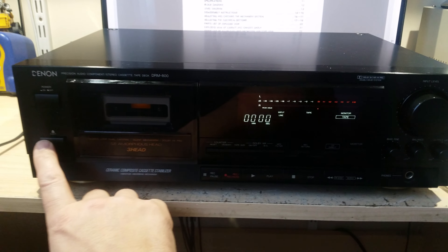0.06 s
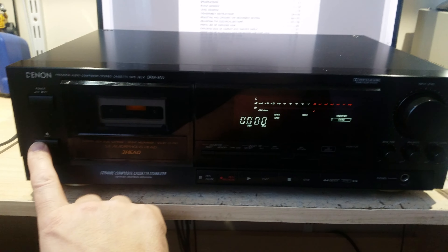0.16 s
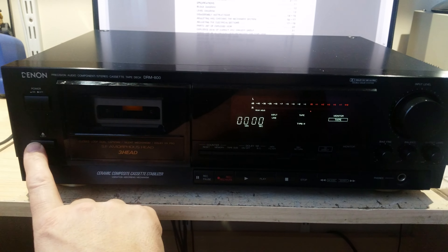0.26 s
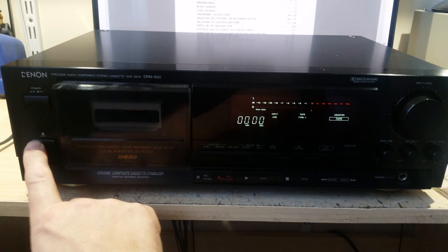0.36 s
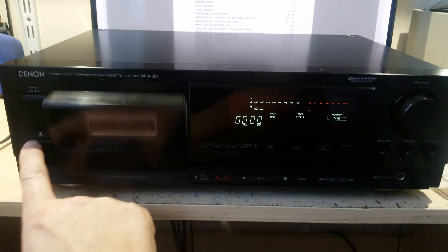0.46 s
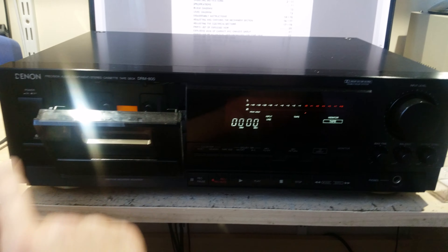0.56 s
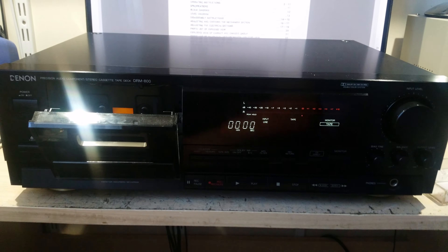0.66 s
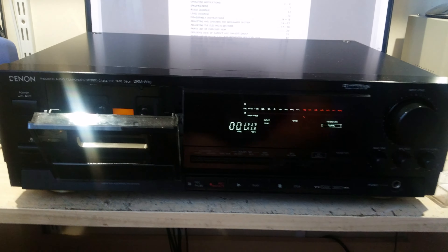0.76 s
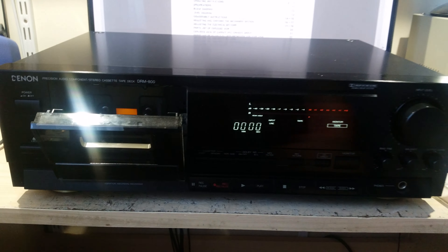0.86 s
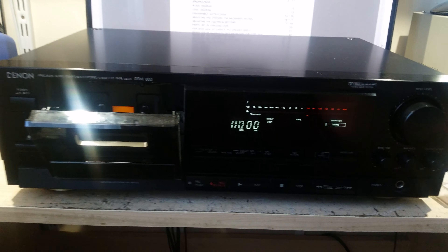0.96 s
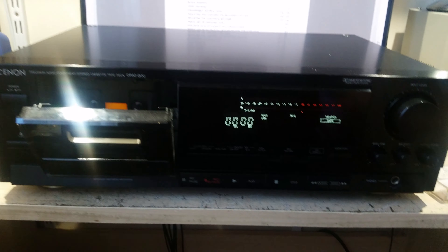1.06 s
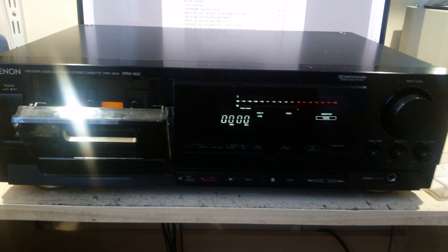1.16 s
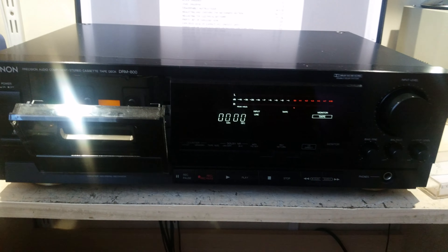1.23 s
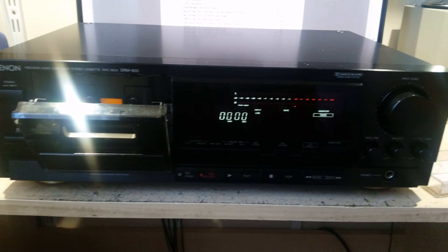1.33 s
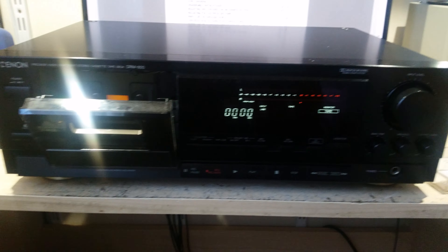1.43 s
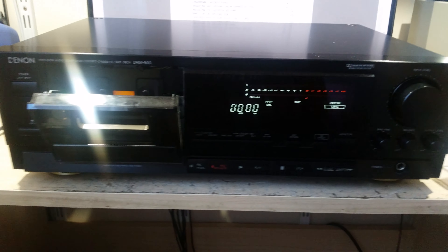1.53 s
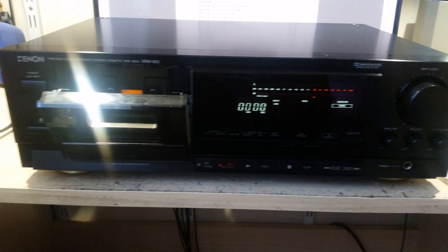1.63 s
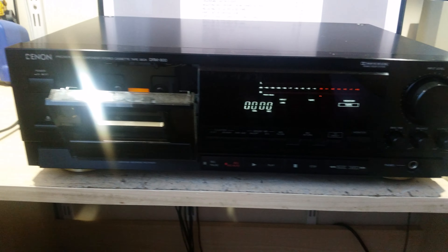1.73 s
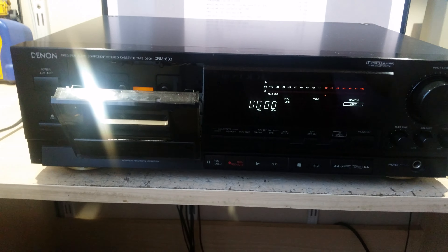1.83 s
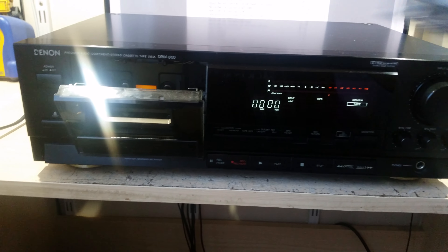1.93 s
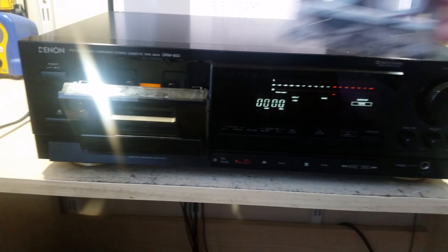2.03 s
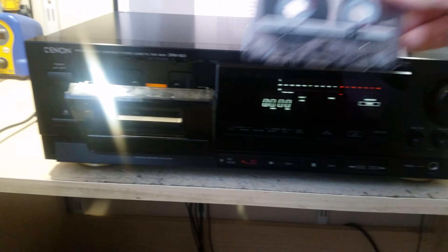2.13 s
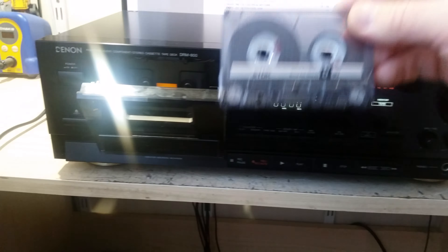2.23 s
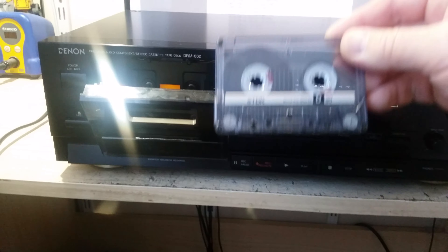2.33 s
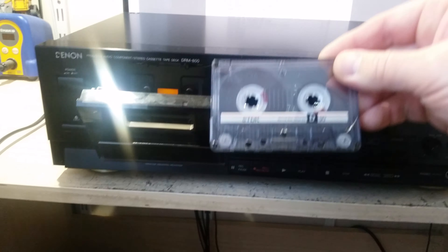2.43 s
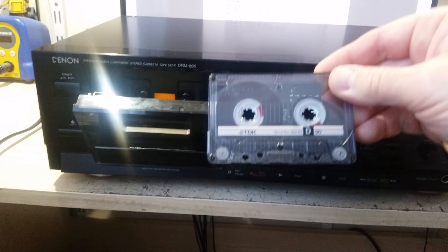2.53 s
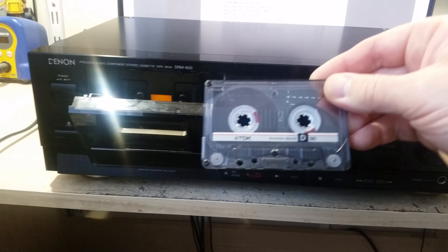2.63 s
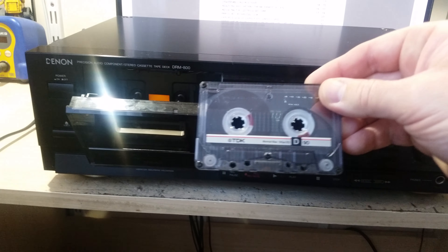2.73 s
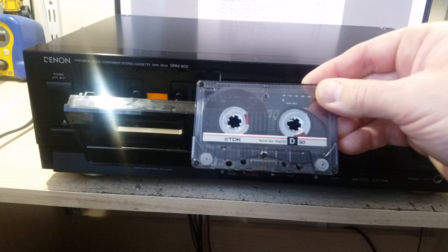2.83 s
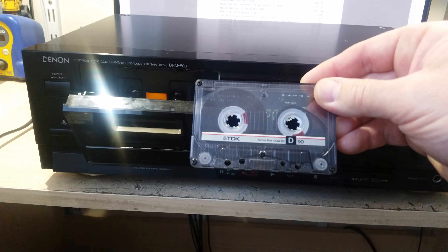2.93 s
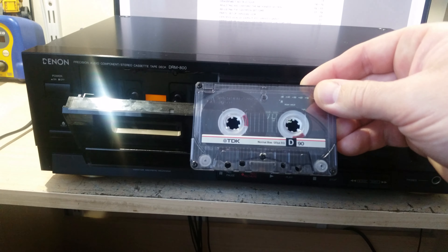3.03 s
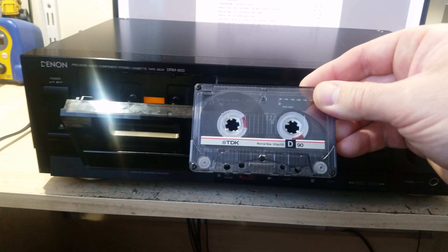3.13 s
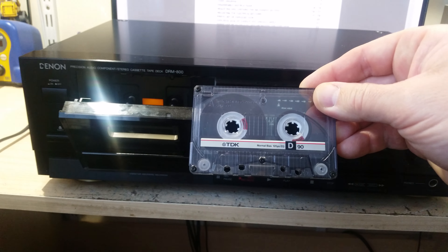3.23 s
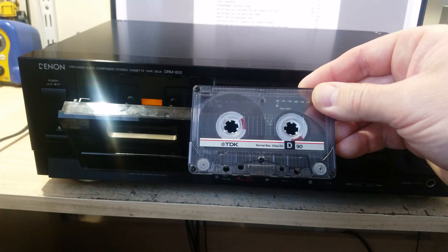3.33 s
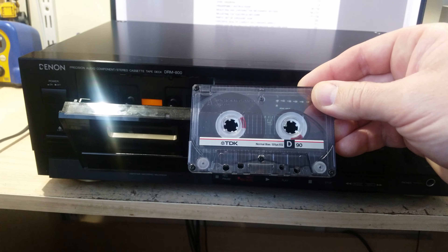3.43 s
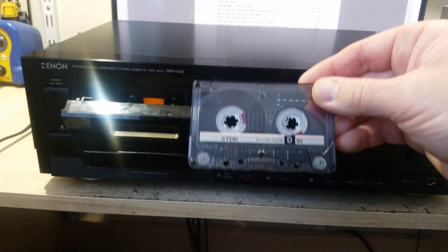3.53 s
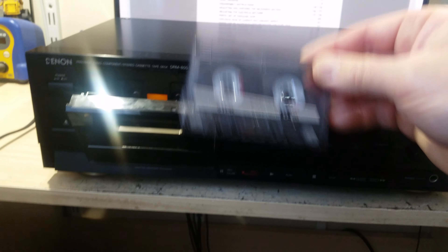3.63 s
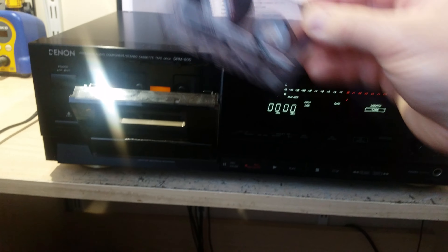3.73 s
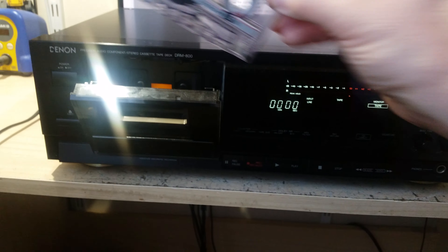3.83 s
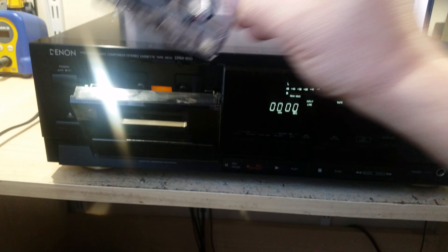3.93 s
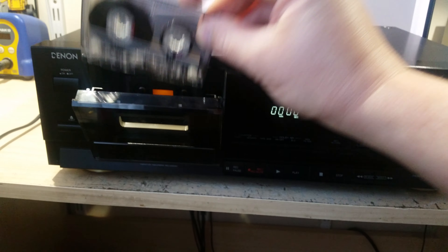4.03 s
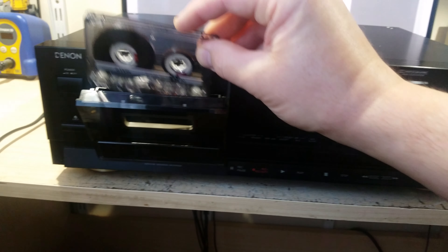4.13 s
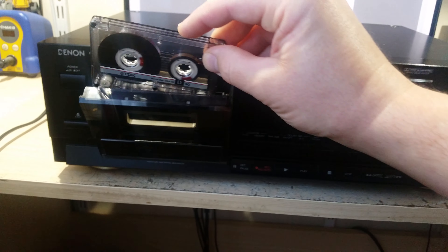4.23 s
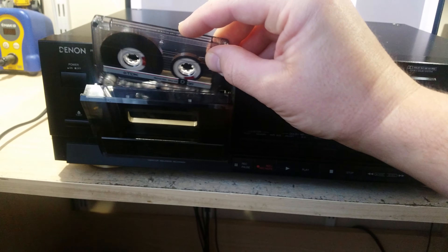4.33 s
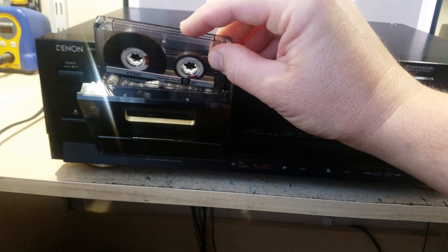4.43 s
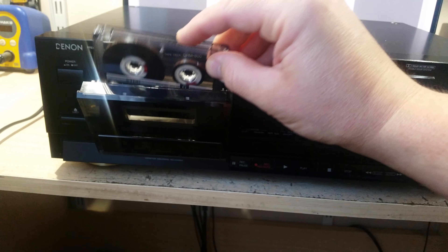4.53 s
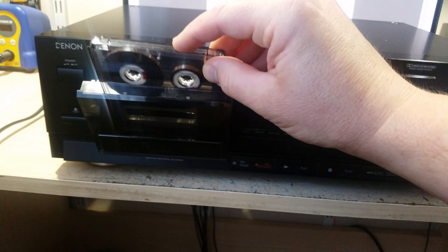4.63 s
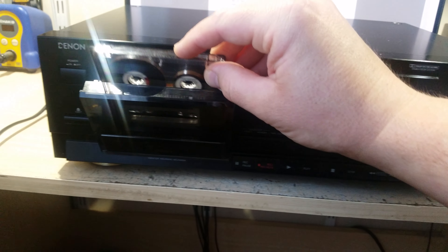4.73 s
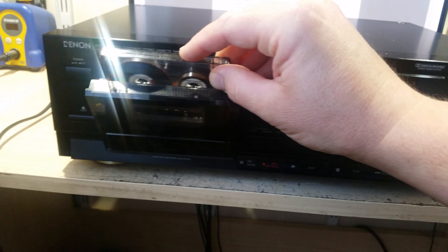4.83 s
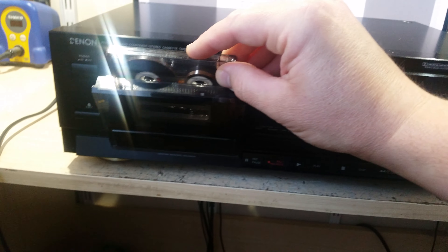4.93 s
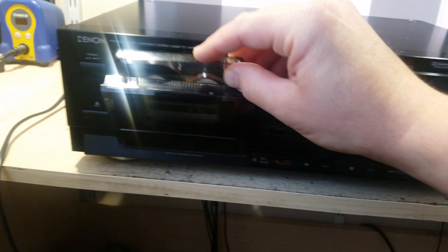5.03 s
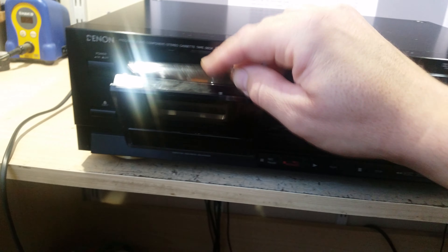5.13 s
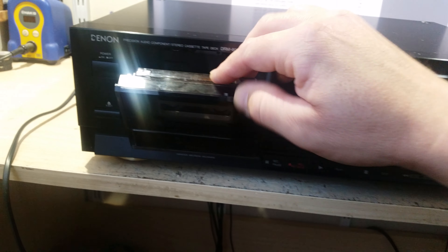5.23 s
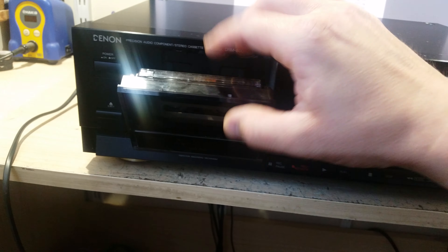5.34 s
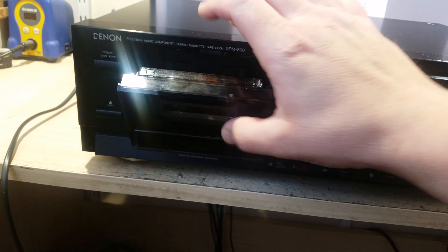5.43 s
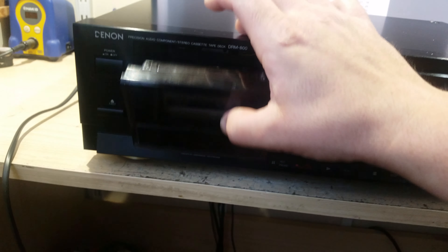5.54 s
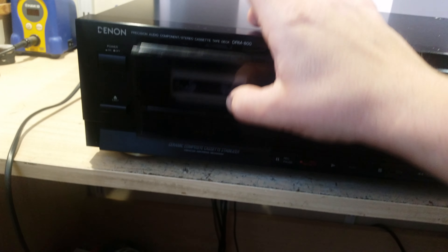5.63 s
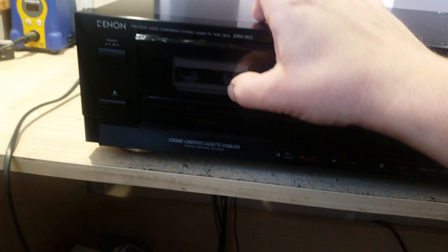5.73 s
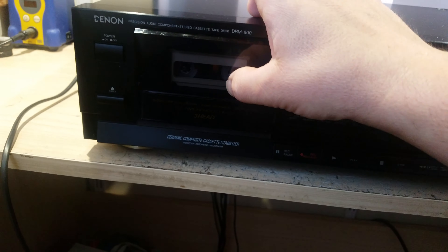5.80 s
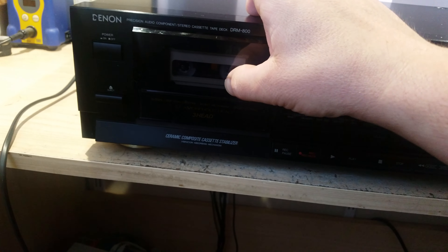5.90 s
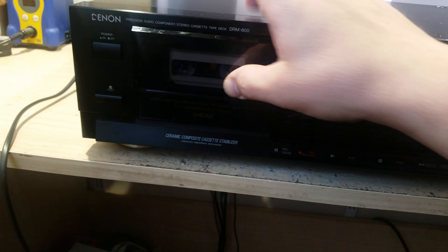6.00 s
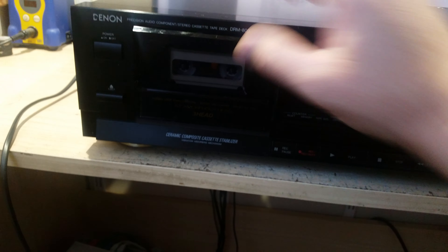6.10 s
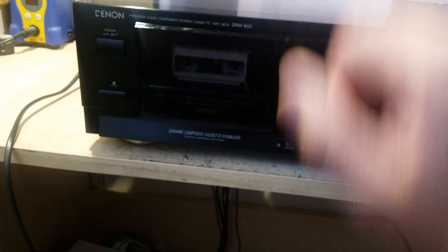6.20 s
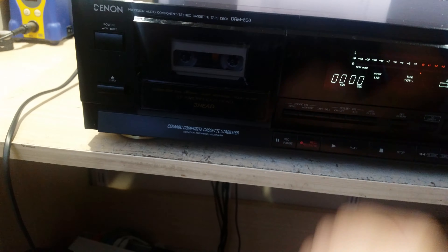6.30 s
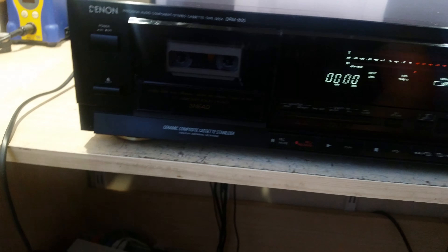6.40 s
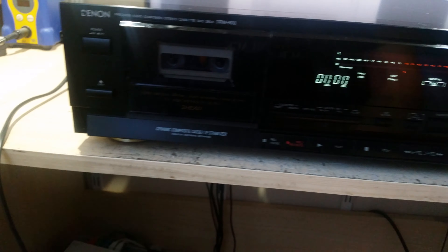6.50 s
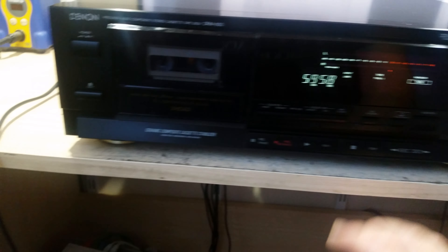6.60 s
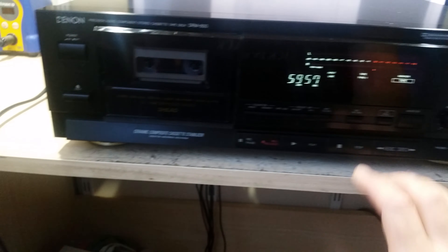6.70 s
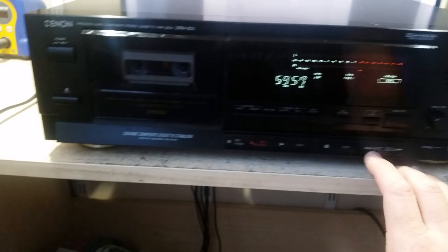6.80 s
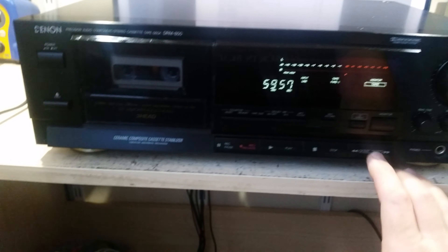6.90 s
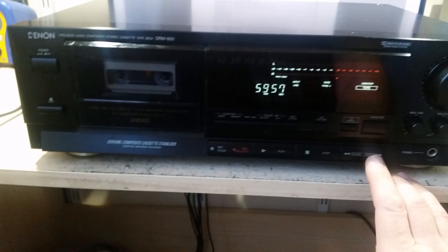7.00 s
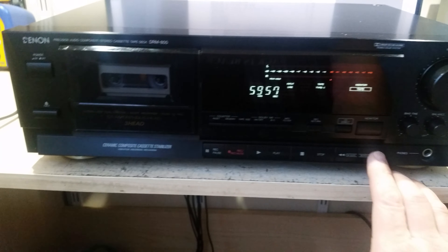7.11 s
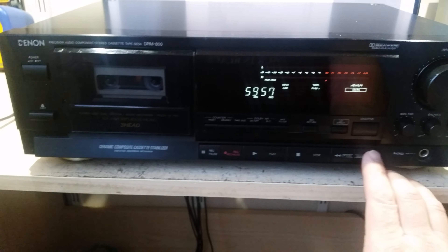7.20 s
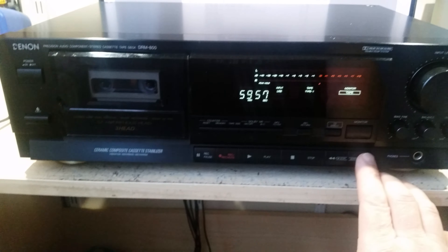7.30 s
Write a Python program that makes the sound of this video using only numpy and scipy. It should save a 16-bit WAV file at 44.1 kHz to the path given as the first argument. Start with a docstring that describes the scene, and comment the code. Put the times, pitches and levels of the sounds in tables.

```python
"""Over room noise, an eject button clicks on a cassette deck on a desk and the door flies open.
A tape clacks and slides out of its case, then into the holder; it seats and the door snaps shut.
Keys click and the motor whine fades in. Each contact rings plastic parts and thuds the cabinet;
slides are many tiny slips with a thin zing; the motor is a set of wavering tones over a whirr.
All is heard close by, in a small room, through the left and right sound ports of a phone."""
import sys
import numpy as np
from scipy import signal
from scipy.fft import rfft, irfft
from scipy.io import wavfile
from scipy.ndimage import uniform_filter1d

SR = 44100
rng = np.random.default_rng(int(sys.argv[2]) if len(sys.argv) > 2 else 0)


def file_out(sig):
    """Save sig as 16-bit WAV at sys.argv[1]."""
    # one column per channel
    cols = np.atleast_2d(sig).T
    # limit, then scale
    lim = np.clip(cols, -1, 1)
    pcm = np.round(lim * 32767).astype(np.int16)
    wavfile.write(sys.argv[1], SR, pcm)


N = 324576
TOP_HZ = 16000  # the phone keeps only what lies below
SIZE = 8192  # samples in one short contact
T = np.arange(SIZE) / SR  # seconds since a contact began
NOW = np.arange(N) / SR  # seconds since the scene began


def undb(db):
    """Turn decibels into a gain."""
    return 10 ** (np.asarray(db) / 20)


def fade(t, t60):
    """Die away by 60 dB in t60 seconds."""
    return np.exp(-np.log(1000) * t / t60)


def level(x, db, span_s=None):
    """Set each channel's average (rms) level, judged over its first span_s seconds if given."""
    head = x if span_s is None else x[..., :int(span_s * SR)]
    rms = np.sqrt(np.mean(head ** 2, axis=-1, keepdims=True) + 1e-24)
    return x * undb(db) / rms


def add(out, start_s, x):
    """Mix a sound in at its start time."""
    i = max(int(start_s * SR), 0)
    out[:, i:i + x.shape[-1]] += x[..., :N - i]


def colour(x, points, size=4096):
    """Filter with the gain drawn by (pitch_hz, level_db) points, without smearing sound ahead of time."""
    hz, db = np.transpose(points)
    f = np.maximum(np.fft.rfftfreq(size, 1 / SR), 1)
    gain = undb(np.interp(np.log(f), np.log(hz), db))
    # folding the cepstrum gives the filter that answers soonest (minimum phase)
    cepstrum = irfft(np.log(gain))
    cepstrum[1:size // 2] *= 2
    cepstrum[size // 2 + 1:] = 0
    response = irfft(np.exp(rfft(cepstrum)))
    return signal.fftconvolve(np.atleast_2d(x), response[None], axes=-1)[:, :x.shape[-1]]


def resonate(x, modes):
    """Ring side-by-side resonances (pitch_hz, width_hz, level_db), added with alternating sign."""
    total = 0
    for k, (hz, width_hz, db) in enumerate(modes):
        b, a = signal.iirpeak(hz, hz / width_hz, SR)
        total = total + (-1) ** k * undb(db) * signal.lfilter(b, a, x)
    return total


def band(x, lo_hz, hi_hz):
    """Keep the sound between two pitches."""
    edges_hz = [lo_hz, min(hi_hz, .45 * SR)]
    return signal.sosfilt(signal.butter(2, edges_hz, "band", fs=SR, output="sos"), x)


def walk(rate_hz):
    """Smooth random drift around zero, with an rms of 1."""
    k = int(SR / rate_hz)
    steps = np.repeat(rng.standard_normal(N // k + 1), k)
    smooth = uniform_filter1d(uniform_filter1d(steps, k), k)
    return level(smooth[:N], 0)


def contacts(spread_db):
    """Dense tiny impacts of uneven size, drawn separately for each port."""
    unevenness = np.minimum(rng.exponential(size=SIZE), 5)
    return rng.standard_normal((2, SIZE)) * undb(spread_db * unevenness)


def stroke(length_s):
    """A push that swells and stops."""
    arch = np.sin(np.pi * np.minimum(T / length_s, 1))
    return np.sqrt(np.maximum(arch, 0))


# Tone of the room noise and hiss: pitch_hz, level_db (relative, per Hz)
AIR_TONE = [(20, -7), (50, 0.5), (125, -10), (165, -20), (230, -15.5), (430, -25), (850, -16), (1550, -26),
            (2200, -27.5), (2750, -45.5), (3950, -28), (4900, -52), (6000, -60.5), (9000, -67),
            (13500, -45.5), (15500, -33.5)]
AIR_DB = -45.2  # noise level before the port balance, without the hum


def air(hum_hz=122, hum_db=-62):
    """Room noise and microphone hiss; a gently wavering low fan drone is shared by both ports."""
    own, shared = rng.standard_normal((2, N)), rng.standard_normal(N)
    b, a = signal.butter(1, [90, 480], "band", fs=SR)
    hiss = own - signal.lfilter(b, a, own)
    drone = signal.lfilter(b, a, shared) * undb(walk(31))
    # two narrow resonances in a row leave a hum
    hum_mode = [(hum_hz, 14, 0)]
    hum = level(resonate(resonate(shared, hum_mode), hum_mode), hum_db)
    return level(colour(hiss + drone, AIR_TONE), AIR_DB) + hum


# The phone shifts in the hand: start_s, length_s, level_db (at the top of the swell)
PHONE_SHIFTS = [(1.344, 1.4, -50), (3.708, 0.9, -54)]


def rumble():
    """Low handling noise: bass noise that swells and sinks while the other hand is busy."""
    swell = np.zeros(N)
    for start_s, length_s, db in PHONE_SHIFTS:
        swell += undb(db) * np.sin(np.pi * np.clip((NOW - start_s) / length_s, 0, 1))
    return swell * level(band(rng.standard_normal(N), 46, 105), 0)


# Tail of the room: low_edge_hz, high_edge_hz, t60_s (before the soft arrival),
# level_db (against the direct sound in that band)
ROOM_TAIL = [(60, 305, 0.37, -1.5), (490, 3300, 0.28, -5.5), (4600, 15000, 0.29, -6.5)]


def room(dry, early_db=-5, early_t60=0.062):
    """Quick reflections from desk and deck, then a short room tail; its bass is alike at both ports."""
    t = np.arange(2 * SIZE) / SR
    arrival = 1 - fade(np.maximum(t - .003, 0), 0.013)  # nothing comes back in the first 3 ms
    early = band(rng.standard_normal((2, len(t))), 550, TOP_HZ)
    response = level(early * arrival * fade(t, early_t60), early_db)
    for lo_hz, hi_hz, t60, db in ROOM_TAIL:
        noise = rng.standard_normal((1 if lo_hz < 200 else 2, len(t)))
        tail = level(band(noise, lo_hz, hi_hz) * arrival * fade(t, t60), db)
        response = response + tail * np.sqrt(2 * (hi_hz - lo_hz) / SR)  # a narrow band holds less energy
    echoes = signal.fftconvolve(dry, response / np.sqrt(len(t)), axes=-1)
    return dry + echoes[:, :dry.shape[-1]]


# Gear tones of the transport: pitch_hz (on average), level_db (before wavering)
GEAR_TONES = [(527.6, -76), (802.1, -74), (952.8, -71), (1798, -82), (3472, -84), (3849, -85)]
# Resonances of the deck's plastic: pitch_hz, width_hz, level_db (relative)
DECK_BODY_MODES = [(614, 70, 5), (743, 64, 11), (832, 29, 8), (1330, 112, 6.5), (1374, 180, -8),
                   (1537, 92, 7), (1700, 170, -13), (1935, 210, -12.5), (2044, 27, 0.5), (2148, 150, 0),
                   (2646, 100, -17.5), (3400, 480, -32.5), (3520, 280, -28), (3766, 326, -29.5),
                   (4700, 530, -54)]
MOTOR_START_S = 6.9


def motor(flutter=.002, whirr_db=-73):
    """The running transport fades in: gear tones wavering in pitch and level over a fine whirr."""
    turns = np.cumsum(1 + flutter * walk(14)) / SR  # time that runs slightly unevenly
    tones = np.zeros(N)
    for hz, db in GEAR_TONES:
        tone = np.sqrt(2) * np.sin(2 * np.pi * hz * turns)
        tones += undb(db) * tone * undb(2 * walk(20))
    whirr = resonate(rng.standard_normal((2, N)), DECK_BODY_MODES)
    whirr = level(band(whirr, 900, 4500), whirr_db)
    return (tones + whirr) * np.clip((NOW - MOTOR_START_S) / .08, 0, 1)


# Soft pushes that rock the desk: start_s, level_db (relative), t60_s
DESK_PUSHES = [(0.41, -47, .2), (0.63, -46, .2), (4.48, -51, .2), (5.26, -46, .25), (5.9, -48, .6),
               (6.122, -38, .09), (6.82, -55, .15)]


def desk_bumps(desk_hz=60):
    """The desk rocks under the hand: a low tone that rises softly and dies away."""
    out = np.zeros((2, N))
    for start_s, db, t60 in DESK_PUSHES:
        shape = fade(NOW, t60) * (1 - fade(NOW, 0.046))
        add(out, start_s, 2 * undb(db) * np.sin(2 * np.pi * desk_hz * NOW) * shape)
    return out


def door_spring():
    """The door spring sings on after the latch closes: one slowly fading tone."""
    out = np.zeros((2, N))
    add(out, 5.896, undb(-57) * np.sin(2 * np.pi * 414.5 * NOW) * fade(NOW, 3.))
    return out


# Plastic sliding on plastic (case, holder): start_s, length_s, body_db, hiss_db, zing_db
# (levels over the slide, before room and port balance)
SLIDE_MOVES = [(1.402, .075, -44, -53, -62), (1.598, .115, -40, -43, -53), (1.675, .04, -41.5, -43, -48),
               (1.808, .13, -53, -57, -74), (1.938, .056, -49.5, -45, -49), (3.769, .021, -49, -63, -64),
               (3.881, .03, -56, -70, -62), (4.278, .033, -42, -60, -52), (5.158, .06, -46, -69, -73),
               (5.228, .08, -46, -58, -45), (5.735, .07, -55, -55.5, -56.5)]


def zings(zing_hz=7470, width_hz=130, grit_db=4, wet=0.51):
    """Each slide excites one narrow, high resonance."""
    out = np.zeros((2, N))
    for start_s, length_s, _, _, zing_db in SLIDE_MOVES:
        buzz = resonate(contacts(grit_db) * stroke(length_s), [(zing_hz, width_hz, 0)])
        add(out, start_s, level(band(buzz, 7200, 7800), zing_db, length_s))
    echoes = room(out) - out
    return out + wet * echoes


# Resonances of the cassette shell: pitch_hz, width_hz, level_db (relative)
SHELL_MODES = [(717, 112, 4.5), (1125, 177, -5), (1450, 107, 1), (2043, 57, -8), (2222, 197, -10.5),
               (2613, 240, -5.5), (2730, 420, -19), (3335, 77, -8), (3614, 480, -7.5)]
# Bright tone of hard contacts and hiss: pitch_hz, level_db (relative, per Hz)
TICK_TONE = [(600, -23), (1500, 12.5), (3500, 7.5), (5200, -2.5), (7000, 2), (9000, -14.5), (11000, 4),
             (14000, 0), (15500, 11.5), (17000, 10)]


def slides(grit_db=5, catches_per_s=110, catch_db=5, catch_t60=.012, drag=0.22):
    """Plastic catches and slips at uneven moments; each slip rings the cassette shell and hisses."""
    out = np.zeros((2, N))
    for start_s, length_s, body_db, hiss_db, _ in SLIDE_MOVES:
        catches = (rng.random(SIZE) < catches_per_s / SR) * undb(catch_db * rng.standard_normal(SIZE))
        slips = drag + signal.fftconvolve(catches, fade(T, catch_t60))[:SIZE]
        onset = 1 - fade(T, 2 * length_s)
        grains = contacts(grit_db) * slips * stroke(length_s) * onset
        body = band(resonate(grains, SHELL_MODES), 950, 3600)
        hiss = colour(grains, TICK_TONE)
        add(out, start_s, level(body, body_db, length_s) + level(hiss, hiss_db, length_s))
    return out


# The many small overlapping modes of thin plastic: pitch_hz, level_db (relative)
CRACK_TONE = [(500, -19), (1100, -6.5), (2000, -1.5), (3000, -9), (4200, -8), (5500, -22), (7000, -19)]
# Resonances of the deck's cabinet: pitch_hz, width_hz, level_db (relative)
CABINET_MODES = [(126.2, 33, -0.5), (194.4, 32, -2.5), (263, 51, -0.5), (328, 42, 0.5), (414, 180, -9)]


def blow(body, knock_db, thud_db, tick_db, hz, part_db, t60, rise_s, part_q=5, spread_db=2.5,
         thud_t60=0.092, snap_db=3, snap_t60=0.016, hard_hz=8000, softening=0.36):
    """A contact grips, snaps and rattles out: it rings the body and the struck part and thuds the cabinet."""
    rise_s = max(rise_s, 1 / SR)
    grip = 1 - fade(T, rise_s)
    push = grip * (fade(T, t60) + undb(snap_db) * fade(T, snap_t60))
    force, splinters = contacts(spread_db) * push, contacts(spread_db) * push
    part = resonate(splinters, [(hz, hz / part_q, part_db)])
    ring = resonate(force, body) + colour(splinters, CRACK_TONE) + part
    top_hz = np.clip(hard_hz * (.001 / rise_s) ** softening, 1500, 9000)  # a slower contact is duller
    knock = band(ring, 560, top_hz)
    tick = colour(force, TICK_TONE)
    shake = rng.standard_normal(SIZE) * grip * fade(T, thud_t60)
    thud = band(resonate(shake, CABINET_MODES), 60, 545)
    return level(knock, knock_db, .015) + level(tick, tick_db, .015) + level(thud, thud_db, .035)


def hits(blows, body, trim_db):
    """All blows on one object; each comes from its own spot, so it has its own reflections."""
    out = np.zeros((2, N))
    for start_s, *contact in blows:
        dry_blow = np.pad(blow(body, *contact), [(0, 0), (0, SIZE)])  # space for the echoes
        add(out, start_s, room(dry_blow))
    return out * undb(trim_db)


SOFT_TICK_DB, HARD_TICK_DB = -43, 3  # tick against knock, softest and hardest contact


def touch(knock_db, hardness, law):
    """A harder contact ticks louder, rises faster and dies sooner."""
    hardness = np.clip(hardness, 0, 1)
    soft, hard = np.array(law)
    rise_s, t60 = soft * (hard / soft) ** hardness
    tick_db = knock_db + SOFT_TICK_DB + (HARD_TICK_DB - SOFT_TICK_DB) * hardness
    return tick_db, t60, rise_s


STRIKE_RISE_S, STRIKE_T60_S, STRIKE_THUD_DB = .0029, .024, -38  # thud levels are before the trim
REBOUND_RISE_S, REBOUND_THUD_DB = .0045, -35.5
REBOUND_TICK_DB = -13  # against the rebound's knock
REBOUND_PART_DB = 5  # ring of the struck part, relative to the body modes


def slam(start_s, knock_db, tick_db, hz, part_db, after_s, rebound_db, rebound_hz, t60):
    """A part strikes its stop short and hard, then falls back with more thud and rattles out."""
    strike = (start_s, knock_db, STRIKE_THUD_DB, tick_db, hz, part_db, STRIKE_T60_S, STRIKE_RISE_S)
    rebound = (start_s + after_s, rebound_db, REBOUND_THUD_DB, rebound_db + REBOUND_TICK_DB,
               rebound_hz, REBOUND_PART_DB, t60, REBOUND_RISE_S)
    return [strike, rebound]


SHELL_HZ, SHELL_DB = 2400, 3  # pitch of the stray ticks; relative ring of the shell
# Fingers shift the cassette: start_s, end_s, level_db (middle knock level, before the trim)
FINGER_SPELLS = [(1.85, 1.91, -49), (2.04, 2.28, -53), (3.83, 4.05, -51), (4.86, 4.91, -52),
                 (5.14, 5.2, -51)]


def fumbles(count=2, scatter_db=4, hardness=.6):
    """Faint stray ticks strewn unevenly over each spell of handling."""
    ticks = []
    for start_s, end_s, db in FINGER_SPELLS:
        for k, (when, size) in enumerate(rng.random((count, 2))):
            tick_s = start_s + (end_s - start_s) * (k + when) / count
            ticks.append((tick_s, db + scatter_db * (size - .5), hardness, SHELL_HZ))
    return ticks


# How the cassette touches, a soft row then a hard row: rise_s, rattle_t60_s
SHELL_TOUCH = [(.02, .032), (.007, .016)]
HOLDER_S = 4.2  # after this the cassette touches the deck and thuds its cabinet more
HAND_THUD_DB, HOLDER_THUD_DB = -53, -44.5  # highest thud before and after, ahead of the trim


def tape_clack(start_s, knock_db, hardness, hz, under_db=-5):
    """The shell is knocked; the thud is set at least 5 dB under the knock."""
    tick_db, t60, rise_s = touch(knock_db, hardness, SHELL_TOUCH)
    thud_db = min(HOLDER_THUD_DB if start_s > HOLDER_S else HAND_THUD_DB, knock_db + under_db)
    return start_s, knock_db, thud_db, tick_db, hz, SHELL_DB, t60, rise_s


# Clacks of the cassette on its case, then on the holder:
# start_s, knock_db (before the trim), hardness (0-1), pitch_hz (of the shell)
SHELL_CLACKS = [ (1.411, -38, .55, 2000), (1.434, -31, .45, 1900), (1.592, -34.5, .5, 2500),
                (1.642, -29.5, .7, 3240), (1.656, -35, .95, 3100), (1.686, -35.5, .82, 2660),
                (1.707, -34, 1, 2900), (1.804, -38, .65, 1720), (1.935, -40, .75, 2870),
                (1.947, -35, .15, 2200), (3.92, -35, .45, 1900), (4.241, -44.5, .6, 3500),
                (4.293, -28, .6, 760), (4.395, -46, .3, 2430), (4.412, -41.5, .15, 660),
                (4.481, -40, .62, 3440), (5.207, -38, .75, 690), (5.235, -32, .75, 2300),
                (5.533, -45, .4, 1220)]
# The cassette seats: start_s, knock_db, tick_db, pitch_hz, part_db (relative ring),
# rebound_after_s, rebound_db, rebound_pitch_hz, rattle_t60_s (levels before the trim)
SEATING_SLAM = (5.246, -15.5, -21.5, 1700, -3, .021, -23, 2300, .105)


def cassette():
    """The tape is unpacked, guided into the holder and pushed home."""
    blows = [tape_clack(*row) for row in SHELL_CLACKS + fumbles()]
    return hits(blows + slam(*SEATING_SLAM), SHELL_MODES, trim_db=-2.5)


# How deck parts touch, a soft row then a hard row: rise_s, rattle_t60_s
PART_TOUCH = [(.028, .095), (.007, .045)]
PART_HZ, PART_DB, PART_DB_PER_OCTAVE = 800, 7, -5  # smaller, higher parts ring less clearly
SOFT_PART_DB = 10  # a soft push sways the whole part, so its ring stands out more


def deck_click(start_s, knock_db, thud_db, hardness, hz):
    """One small part of the deck meets its stop."""
    tick_db, t60, rise_s = touch(knock_db, hardness, PART_TOUCH)
    size_db = PART_DB + PART_DB_PER_OCTAVE * np.log2(hz / PART_HZ)
    part_db = size_db + SOFT_PART_DB * (1 - 2 * hardness)
    return start_s, knock_db, thud_db, tick_db, hz, part_db, t60, rise_s


# Clicks of buttons, door and transport levers:
# start_s, knock_db, thud_db (both before the trim), hardness (0-1), pitch_hz (of the part)
DECK_CLICKS = [ (.079, -27, -51, .28, 870), (.265, -40.5, -47.5, .8, 2200), (.386, -37.5, -41.5, .05, 860),
               (.407, -32, -35, .42, 800), (.576, -32, -40, .8, 2200), (.598, -23.5, -37.5, .48, 1590),
               (.805, -44.5, -52, .4, 1030), (5.733, -39, -58, .1, 680), (5.782, -34.5, -48, .55, 1670),
               (5.801, -25.5, -41, .65, 1190), (5.81, -37.5, -45, .6, 3820), (6.441, -32, -39.5, .55, 2400),
               (6.556, -40.5, -42, 0, 3600), (6.595, -42, -40, 1, 2110), (6.622, -49, -42, 1, 2000),
               (6.694, -36, -40.5, 0, 820), (6.773, -35.5, -40, .5, 2020), (6.786, -32.5, -35.5, .15, 784),
               (6.802, -39, -37.5, .88, 2120), (6.82, -23, -33.5, .4, 1450), (6.891, -44, -55, .5, 3300),
               (6.961, -36, -40.5, .1, 720)]
# The door flies open, later its latch shuts: start_s, knock_db, tick_db, pitch_hz, part_db (relative
# ring), rebound_after_s, rebound_db, rebound_pitch_hz, rattle_t60_s (levels before the trim)
DOOR_STOPS = [(.625, -19.5, -33, 3500, 13, .009, -25.5, 880, .045),
              (5.89, -24.5, -21.5, 1960, -2, .006, -17.5, 1000, .047)]


def deck():
    """Buttons and levers click, and the door slams twice."""
    blows = [deck_click(*row) for row in DECK_CLICKS]
    for row in DOOR_STOPS:
        blows += slam(*row)
    return hits(blows, DECK_BODY_MODES, trim_db=-3.5)


def long_waves(x, alike_hz=750):
    """Long waves reach both ports alike: the right port takes the left one's low sound."""
    low_pass = signal.butter(3, alike_hz, fs=SR, output="sos")
    low_difference = signal.sosfiltfilt(low_pass, x[0] - x[1])
    return np.vstack([x[0], x[1] + low_difference])


def ports(x, balance):
    """The left port faces the deck; the right port is shaded, mostly softer."""
    shade = [(hz, -db) for hz, db in balance]
    return np.vstack([x[0], colour(x[1], shade)[0]])


# Balance of the deck and hand sounds: pitch_hz, left_minus_right_db
NEAR_BALANCE = [(60, 5.5), (200, 3.5), (400, 4), (700, 9), (1300, 12), (2500, 13.5), (4400, 10), (7500, -1),
                (10000, -2), (15000, 3)]
# Balance of the room noise: pitch_hz, left_minus_right_db
NOISE_BALANCE = [(50, 20), (125, 6.3), (200, 5.7), (400, 3.4), (800, 13.7), (2100, 12.2), (2800, 4),
                 (3900, 12.6), (5500, 1.3), (9000, 1), (15500, 8.3)]


def scene():
    """Deck, cassette and hands close by, over the room noise."""
    background = ports(air(), NOISE_BALANCE)
    near = rumble() + motor() + desk_bumps() + door_spring()
    near = near + zings() + room(slides()) + cassette() + deck()
    return background + ports(long_waves(near), NEAR_BALANCE)


def record(dry):
    """The phone cuts the top with a steep low-pass."""
    return signal.sosfilt(signal.ellip(10, .2, 80, TOP_HZ, fs=SR, output="sos"), dry)


dry = scene()
out = record(dry)
file_out(out)
```